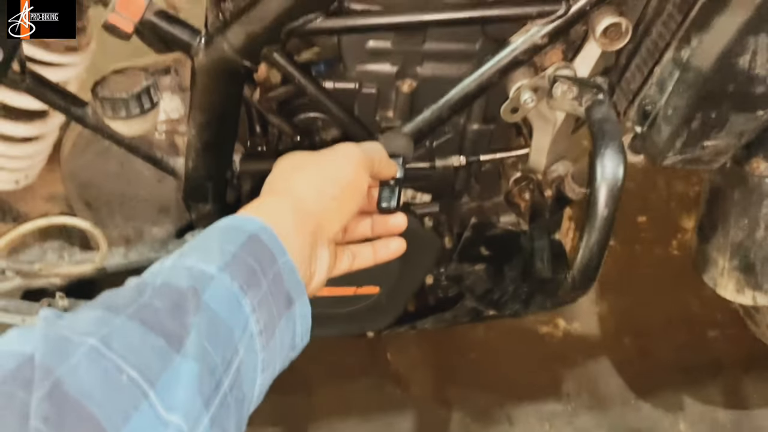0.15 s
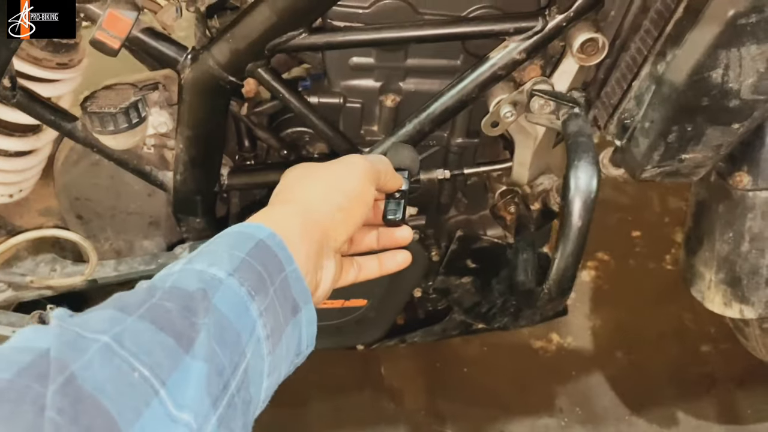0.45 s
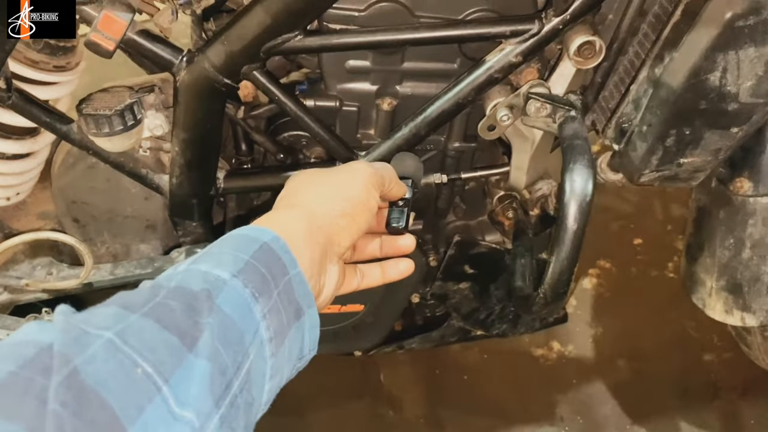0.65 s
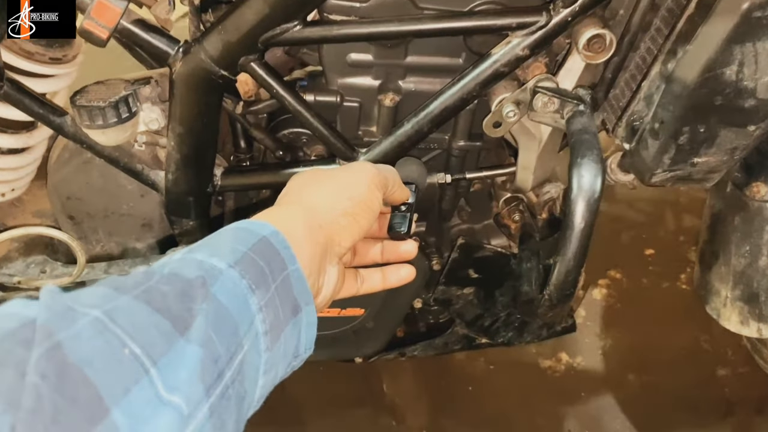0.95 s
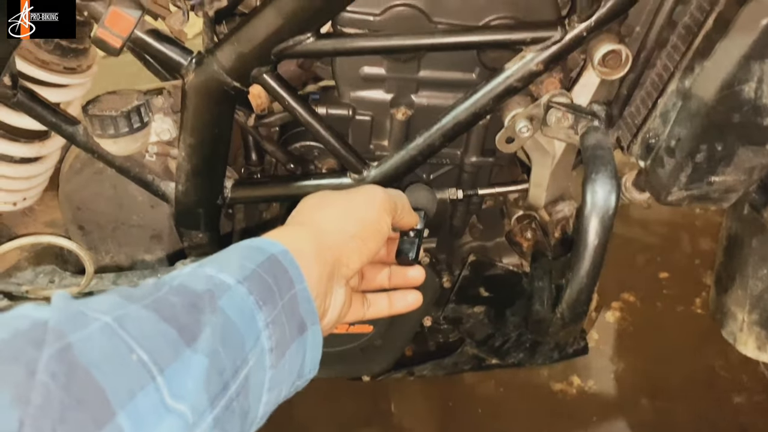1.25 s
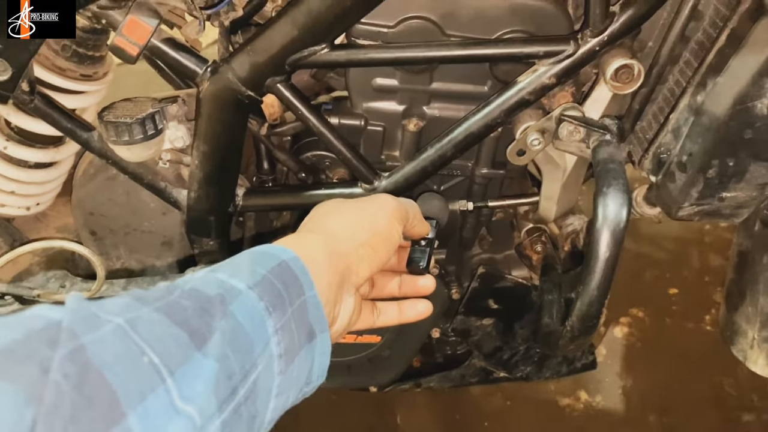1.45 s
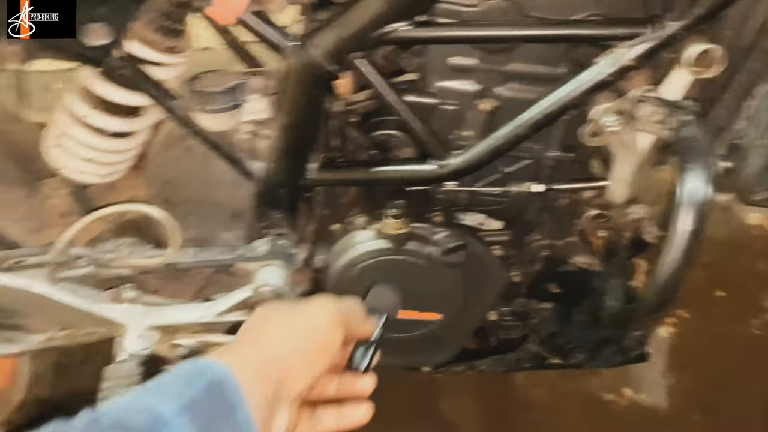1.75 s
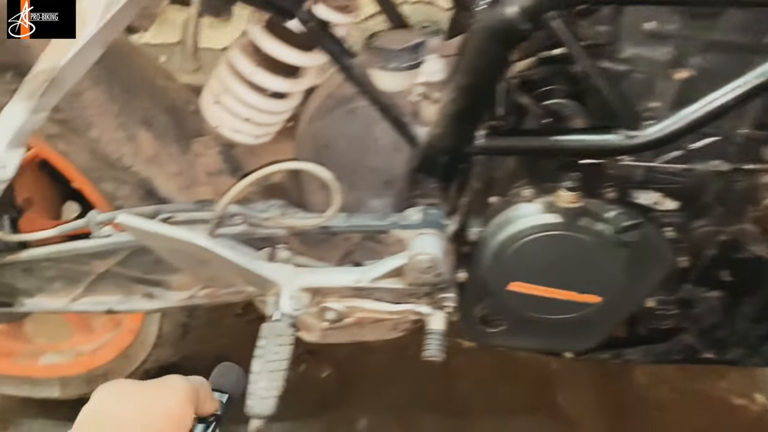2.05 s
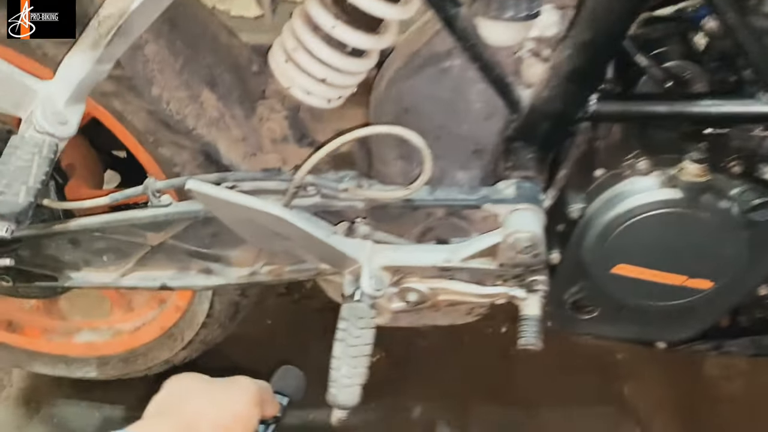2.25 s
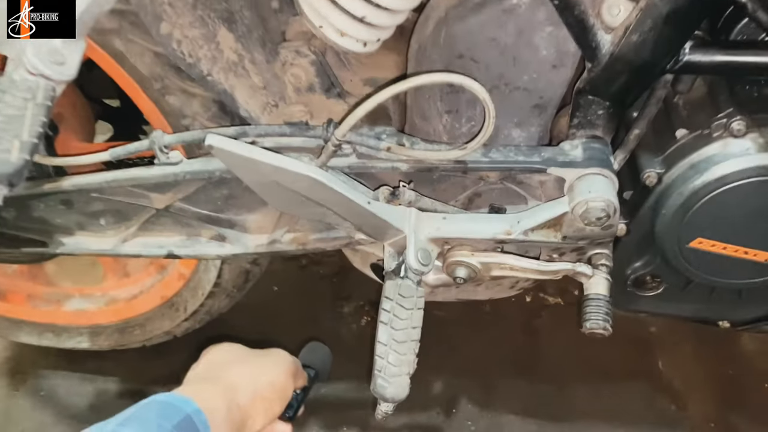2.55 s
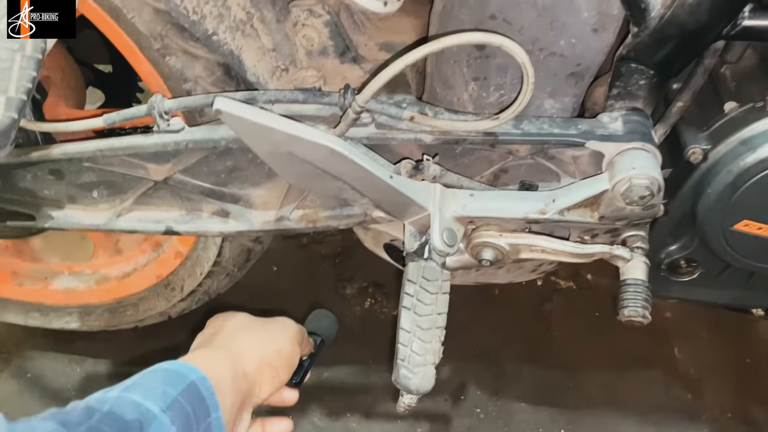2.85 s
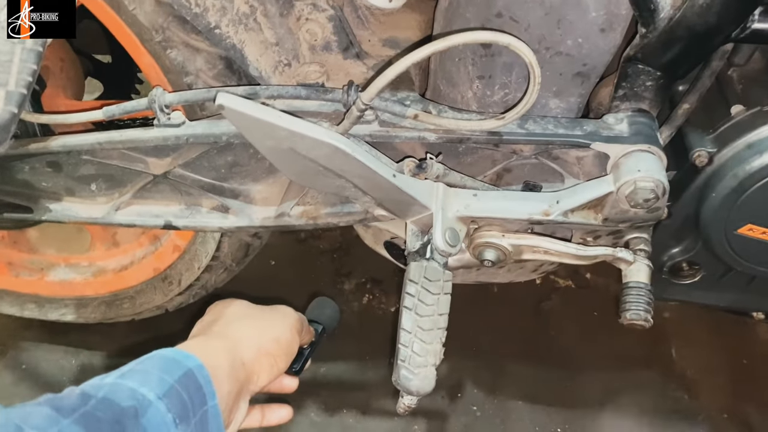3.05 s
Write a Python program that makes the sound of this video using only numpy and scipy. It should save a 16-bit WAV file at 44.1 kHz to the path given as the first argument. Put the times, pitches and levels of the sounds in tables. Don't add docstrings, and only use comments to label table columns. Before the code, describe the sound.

A single-cylinder motorcycle engine idles steadily in a workshop, about fourteen or fifteen firings per second. Until 1.7 s the hand-held microphone is at the block: fairly quiet, ringing metallic valve and chain rattle over low rumble. From 1.7 to 2.6 s it moves to the exhaust; clatter fades and deep, hollow thumps swell. From about 2.7 s to the end at 3.2 s, gas buffets and overloads it, very loud and bassy.

```python
import sys
import numpy as np
from scipy import signal
from scipy.fft import rfft, irfft
from scipy.io import wavfile

SR = 44100
rng = np.random.default_rng(int(sys.argv[2]) if len(sys.argv) > 2 else 0)


def gain_from_db(level_db):
    decades = np.asarray(level_db, float) / 20
    return 10 ** decades


def store_wav(level_fs):
    pcm = np.round(np.clip(np.atleast_2d(level_fs), -1, 1) * 32767)
    wavfile.write(sys.argv[1], SR, pcm.T.astype(np.int16))


N = 141120


def rms_one(x):
    return x / np.sqrt(np.mean(x ** 2) + 1e-20)


def in_time(rows):
    s, *columns = np.transpose(rows)
    return [np.interp(np.arange(N) / SR, s, c) for c in columns]


def drift(rate_hz):
    r = np.exp(-2 * np.pi * rate_hz / SR)
    wander = signal.lfilter([1], [1, -2 * r, r * r], rng.standard_normal(N + SR))
    return rms_one(wander[SR:])


def band(low_hz, high_hz):
    sos = signal.butter(3, [low_hz, high_hz], "band", fs=SR, output="sos")
    return rms_one(signal.sosfilt(sos, rng.standard_normal(N)))


def coloured(spectrum):
    hz, db = np.transpose(spectrum)
    grid_hz = np.arange(N // 2 + 1) * SR / N + 1
    gain = gain_from_db(np.interp(np.log(grid_hz), np.log(hz), db))
    return rms_one(irfft(rfft(rng.standard_normal(N)) * gain, N))


def ring(drive, hz, t60_s):
    r = gain_from_db(-60 / (t60_s * SR))
    w = 2 * np.pi * hz / SR
    return signal.lfilter([0, np.sin(w)], [1, -2 * r * np.cos(w), r * r], drive + 1e-18)


# f/Hz, level/dB [dB per Hz]
RUMBLE_SPECTRUM = [(12, -54), (20, -21), (75, 2.5), (129, -20.5), (190, -6.5), (267, -37.5), (330, 14),
                   (430, -19.5), (730, -120)]
RUMBLE_DB = -59
FRAME_HZ, FRAME_T60_S, FRAME_DB = 71.8, 1, -52.5


def rumble():
    shaken = ring(rng.standard_normal(N), FRAME_HZ, FRAME_T60_S)
    frame = rms_one(ring(shaken, FRAME_HZ, 0.24))
    return gain_from_db(RUMBLE_DB) * coloured(RUMBLE_SPECTRUM) + gain_from_db(FRAME_DB) * frame


# t/s, speed [rpm]
CRANK_SPEED = [(0.0, 1658.8), (0.173, 1729.4), (0.48, 1721.9), (0.595, 1634.9), (0.647, 1772.8),
               (1.185, 1705.1), (1.406, 1856.0), (1.49, 1768.2), (1.615, 1690.6), (1.844, 1819.1),
               (1.91, 1764.1), (2.006, 1751.0), (2.117, 1759.7), (2.396, 1774.0), (2.759, 1734.3),
               (2.774, 1786.2), (3.274, 1711.4)]
FIRST_FIRING_S = .0114


def cycles():
    count = np.cumsum(in_time(CRANK_SPEED)[0]) / 120 / SR
    return count - count[int(FIRST_FIRING_S * SR)]


TAPS_PER_S, TAP_SPREAD_DB = 1400, 3


def rattle(beat_db, resonances, patchy_db):
    out = np.zeros(N)
    for hz, width_hz, db in resonances:
        sizes = gain_from_db(TAP_SPREAD_DB * np.minimum(rng.exponential(1, N), 4)) * rng.choice([-1, 1], N)
        struck = rng.random(N) < TAPS_PER_S / SR
        taps = sizes * struck * gain_from_db(beat_db + patchy_db * drift(20.2))
        rung = ring(ring(taps, hz, 2.5 / width_hz), hz, 2.4 / width_hz)
        out += gain_from_db(db) * np.sqrt(width_hz) * rms_one(rung)
    return rms_one(out)


# time after firing [share of cycle], extra level/dB, width [share of cycle]
VALVE_CONTACTS = [
    (0.032, 7, 0.028),
    (0.271, 4, 0.15),
    (.47, 8.5, 0.017),
    (0.722, 3, 0.065),
    (0.918, 6.5, 0.06),
]
# t/s, then level/dB of ringing cover, upper cover, side cover, clatter
COVER_NEARNESS = [(0, -32.5, -33.5, -78, -43), (.15, -33, -36.5, -82.5, -42),
                  (.44, -32.5, -40.5, -75, -45.5), (.47, -33.5, -47.5, -60, -43),
                  (.53, -31, -48, -70, -44.5), (.56, -47, -52, -64, -44), (1.1, -44.5, -60, -54, -44),
                  (1.3, -50.5, -67, -43, -42), (1.5, -45, -67, -54, -43), (1.8, -60, -71, -55, -44),
                  (2.0, -53.5, -70, -69, -48), (3.2, -77, -66.5, -50.5, -47)]
# f/Hz, width [Hz], level/dB
RINGING_MODES = [(1096, 25.4, -4.5), (1164, 95, -1.5), (1222, 60, -2), (1298, 65, -4), (1390, 40, -11.5)]
UPPER_MODES = [(2297, 230, 2), (2425, 100, 0), (2617, 90, -2), (3050, 250, -3), (3434, 240, -7),
               (7780, 390, -20.5)]
SIDE_MODES = [(1700, 27, -1.6), (1776, 89, -0.39)]
CLATTER_MODES = [(1286, 266, -4), (1791, 270, -10), (2260, 60, -1), (2556, 480, -7), (3026, 75, -4.5),
                 (3660, 440, -4.5), (4310, 590, -8.5), (6090, 190, -15), (7210, 470, -13),
                 (8950, 1100, -15.5)]
# f/Hz, level/dB [dB per Hz]
WASH_SPECTRUM = [(260, -47), (450, -9), (1000, -9), (1230, -9.5), (1490, -9.5), (3740, -16), (5260, -23.5),
                 (7280, -22), (15500, -46)]
WASH_DB, CLATTER_PEAKS_DB, AIR_DB = -2, -5, -40.5
METAL_TOP_HZ = 9660


def valve_gear(count):
    beat_db = 0
    for at, db, width in VALVE_CONTACTS:
        from_contact = (count - at + .5) % 1 - .5
        beat_db = beat_db + db * np.exp(-.5 * (from_contact / width) ** 2)
    ringing_db, upper_db, side_db, clatter_db = in_time(COVER_NEARNESS)

    wash = gain_from_db(WASH_DB) * rms_one(coloured(WASH_SPECTRUM) * gain_from_db(1.07 * beat_db + drift(60)))
    peaks = gain_from_db(CLATTER_PEAKS_DB) * rattle(beat_db, CLATTER_MODES, patchy_db=1.5)
    metal = gain_from_db(clatter_db) * (wash + peaks)
    metal += gain_from_db(ringing_db) * rattle(0.7 * beat_db, RINGING_MODES, patchy_db=3.0)
    metal += gain_from_db(upper_db) * rattle(beat_db, UPPER_MODES, patchy_db=1.5)
    metal += gain_from_db(side_db) * rattle(beat_db, SIDE_MODES, patchy_db=3.5)

    air = gain_from_db(clatter_db + AIR_DB + 1.2 * beat_db) * band(8700, 16000)
    dulled = signal.sosfilt(signal.butter(4, METAL_TOP_HZ, fs=SR, output="sos"), metal)
    return air + 0.045 * metal + 0.8 * dulled


def puff(clicks, delay_s, width_s):
    lead_s = .004
    t = np.arange(int(.03 * SR)) / SR - lead_s - delay_s
    shape = np.exp(-.5 * (t / width_s) ** 2)
    lead = int(lead_s * SR)
    return signal.fftconvolve(clicks, shape / shape.sum())[lead:lead + N]


VALVE_OPEN_S = .01738


def silencer(fires, level_db, modes, edge_s, spread):
    out = np.zeros(N)
    closings = fires + int(VALVE_OPEN_S * SR)
    for hz, t60_s, opens, closes in modes:
        uneven = 1 + spread * rng.standard_normal((len(fires), 2)).T
        clicks = np.zeros(N + SR)
        clicks[[fires, closings]] = [[opens], [closes]] * gain_from_db(level_db[fires]) * uneven
        out += ring(clicks[:N], hz, t60_s)
    return puff(out, 0, edge_s)


# f/Hz, t60 [s], level/dB
TAIL_PIPE_MODES = [(570, 0.065, -30), (674.3, 0.17, -34.5)]
OUTFLOW_S = 0.011
BUFFET_RISE_S, BUFFET_FALL_S = .012, 0.014
BUFFET_DB, BUFFET_HZ = -15, 130
POP_DB = -15
FLUTTER_DB, FLUTTER_HZ = -22.5, 850
HISS_DB, HISS_HZ = -68, 9000


def buffeting(fires, jet_db, outlet_db):
    t = np.arange(int(.09 * SR)) / SR
    chance_db = 1.96 * rng.standard_normal(len(fires))
    jet_clicks, outlet_clicks = np.zeros((2, N))
    jet_clicks[fires] = gain_from_db(jet_db[fires] + chance_db)
    outlet_clicks[fires] = gain_from_db(outlet_db[fires] + chance_db)

    gust_shape = (t / BUFFET_RISE_S) ** 2 * np.exp(-t / BUFFET_FALL_S * 2)
    gust = signal.fftconvolve(jet_clicks, gust_shape / gust_shape.max())[:N]
    fade = np.cos(np.pi / 2 * t / t[-1]) ** 2
    outflow_shape = t / OUTFLOW_S * np.exp(1 - t / OUTFLOW_S) * fade
    outflow = signal.fftconvolve(outlet_clicks, outflow_shape)[:N]

    pipe = np.zeros(N)
    for hz, t60_s, db in TAIL_PIPE_MODES:
        singing = ring(ring(rng.standard_normal(N), hz, t60_s), hz, 0.011)
        pipe += gain_from_db(db) * outflow * rms_one(singing)

    turbulence = gain_from_db(BUFFET_DB) * band(60, BUFFET_HZ)
    turbulence += gain_from_db(POP_DB) * band(176, 382)
    turbulence += gain_from_db(FLUTTER_DB) * band(367, FLUTTER_HZ)
    turbulence += gain_from_db(HISS_DB + jet_db) * band(HISS_HZ, 15500)
    return pipe + gust * turbulence


# t/s, then level/dB of silencer shell, outlet, gas jet
MIC_TRAVEL = [
    (0, 1, -42, -53),
    (1.7, 0, -36.5, -70),
    (1.9, -2, -18.5, -57),
    (2.1, -5.5, -9, -46),
    (2.3, -6, -5, -25.5),
    (2.6, -23.5, 5, -11),
    (2.78, -9, 5.5, -3),
    (2.9, -16, 1.5, 3),
    (3.08, -16, 2, 6),
    (3.2, -21, 6, 11),
]
# f/Hz, t60 [s], strength as the valve opens, as it closes [sign = push or pull]
SHELL_MODES = [(61.0, 0.122, 0.004, 0.009), (112.0, 0.103, 0.003, 0.003), (134.0, 0.118, -0.01, 0.005),
               (154.0, 0.125, -0.008, 0.001), (200.0, 0.051, -0.031, -0.01), (249.0, 0.147, -0.008, -0.003),
               (310.0, 0.059, 0.021, -0.02), (345.0, 0.195, -0.034, 0.024), (358.0, 0.172, -0.048, -0.025),
               (374.0, 0.25, 0.048, 0.03), (558.0, 0.144, 0.006, 0.006), (673.0, 0.25, -0.018, -0.013)]
OUTLET_MODES = [(61.0, 0.122, 0.043, 0.016), (112.0, 0.103, 0.134, -0.038), (134.0, 0.118, -0.288, 0.091),
                (154.0, 0.125, 0.082, 0.016), (200.0, 0.051, -0.072, -0.024),
                (249.0, 0.147, -0.026, -0.007), (310.0, 0.059, -0.034, 0.009),
                (345.0, 0.195, -0.107, 0.035), (358.0, 0.172, -0.011, -0.044), (374.0, 0.25, 0.098, 0.063),
                (558.0, 0.144, 0.079, -0.008), (673.0, 0.25, -0.146, -0.003)]
JET_MODES = [(61, .08, .355, -.18), (92, .08, -.45, .1), (112, .07, -.5, .3), (134, .055, .33, .33),
             (200, .05, .03, -.3), (250, .05, -.05, -.35), (310, .05, -.2, -.15)]
FIRING_SPREAD_DB = .8
EDGE_S, JET_EDGE_S = .0005, .0009


def exhaust(count):
    fires = np.flatnonzero(np.diff(np.floor(count)) > 0)
    uneven_db = np.repeat(FIRING_SPREAD_DB * rng.standard_normal(N // 1000 + 1), 1000)[:N]
    shell_db, outlet_db, jet_db = in_time(MIC_TRAVEL)
    shell = silencer(fires, shell_db + uneven_db, SHELL_MODES, EDGE_S, spread=0.025)
    outlet = silencer(fires, outlet_db + uneven_db, OUTLET_MODES, EDGE_S, spread=0.044)
    jet = silencer(fires, jet_db + uneven_db, JET_MODES, JET_EDGE_S, spread=0.2)
    return shell + outlet + jet + buffeting(fires, jet_db, outlet_db)


def scene():
    count = cycles()
    return (rumble() + valve_gear(count) + exhaust(count))[None]


def roll_off(x):
    return signal.sosfilt(signal.butter(12, 15710, fs=SR, output="sos"), x)


CEILING = .78
MIC_LOW_HZ, MIC_HISS_DB = 4, -95


def record(dry):
    capsule = CEILING * np.tanh(dry / CEILING) + gain_from_db(MIC_HISS_DB) * band(9000, 18000)
    low_cut = signal.butter(1, MIC_LOW_HZ, "high", fs=SR, output="sos")
    mix = signal.sosfilt(low_cut, capsule)
    return roll_off(mix)


dry = scene()
out = record(dry)
store_wav(out)
```